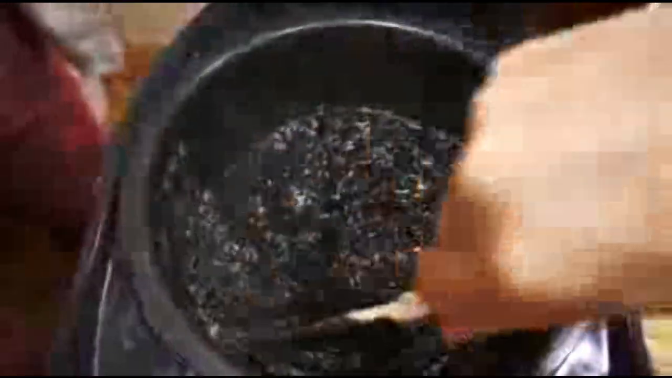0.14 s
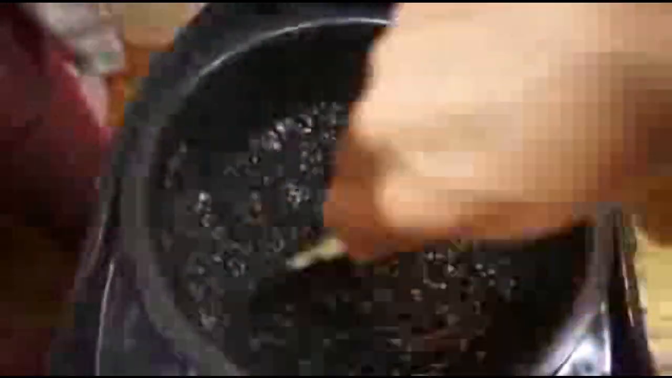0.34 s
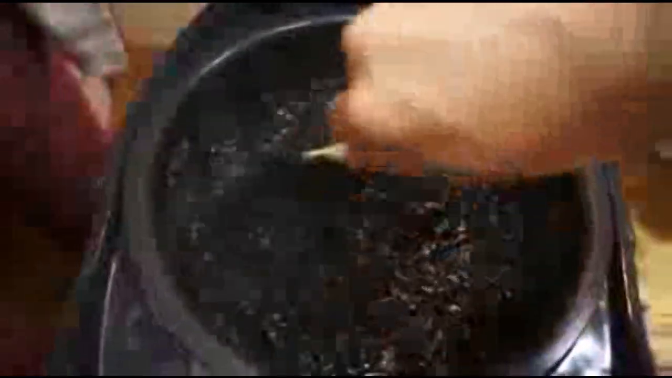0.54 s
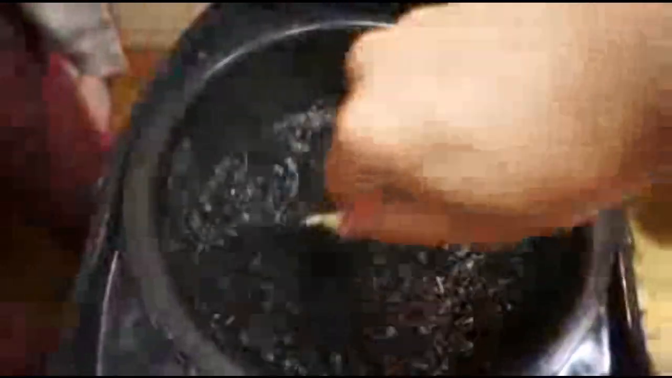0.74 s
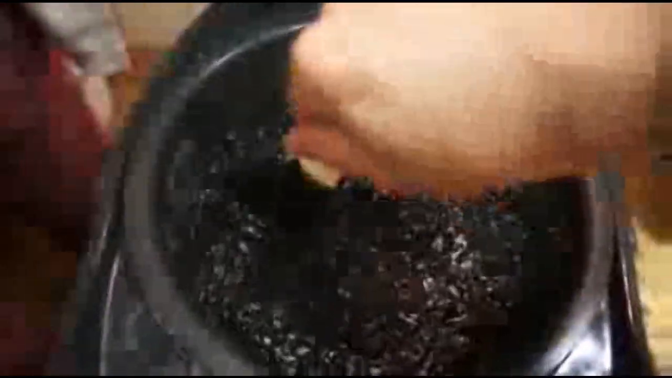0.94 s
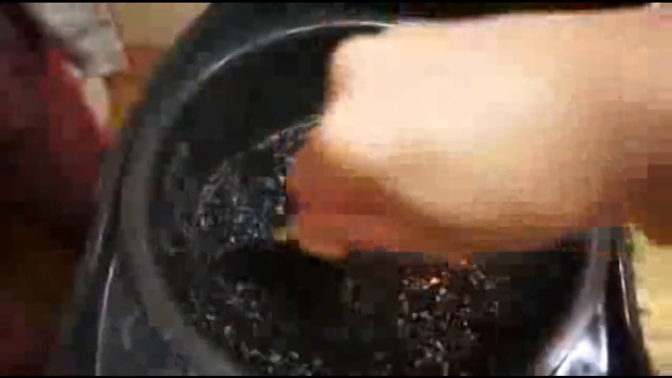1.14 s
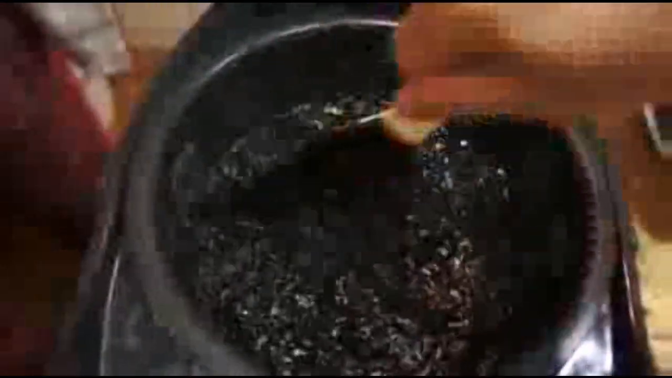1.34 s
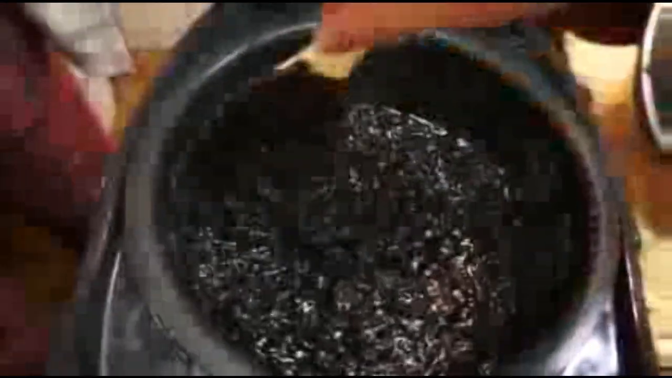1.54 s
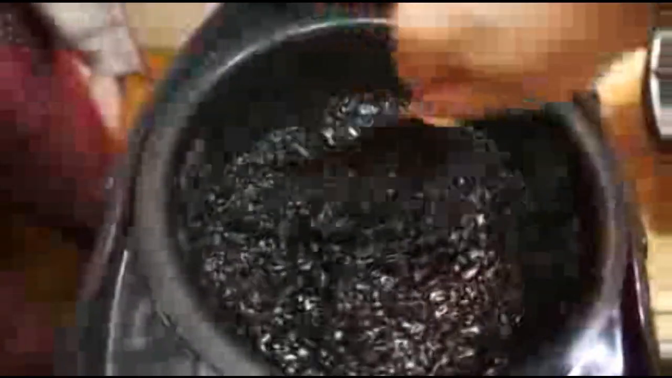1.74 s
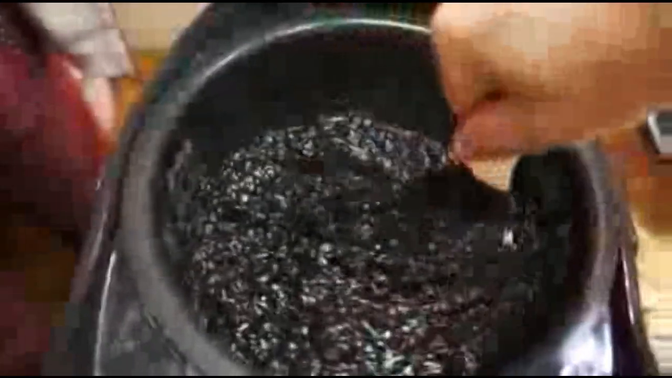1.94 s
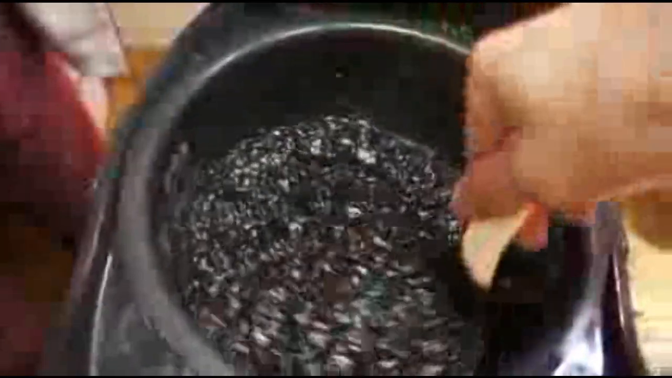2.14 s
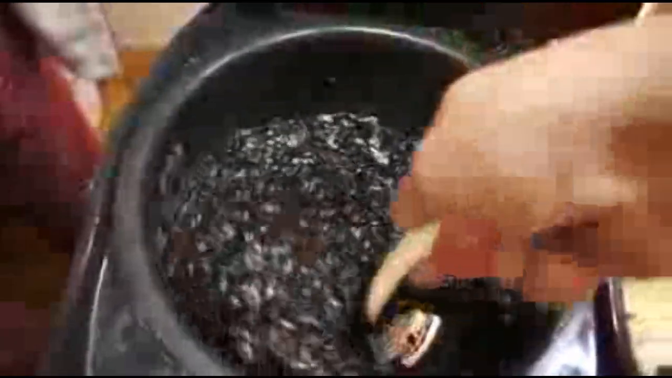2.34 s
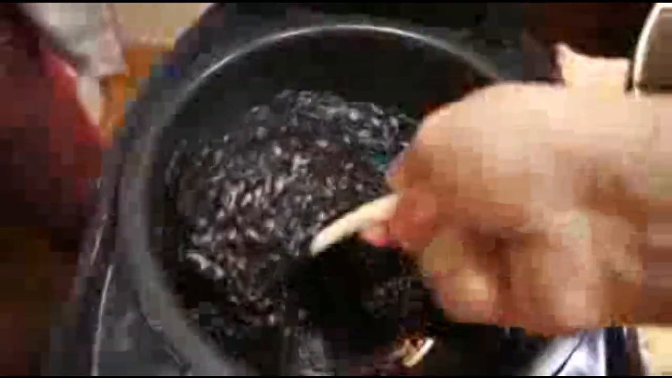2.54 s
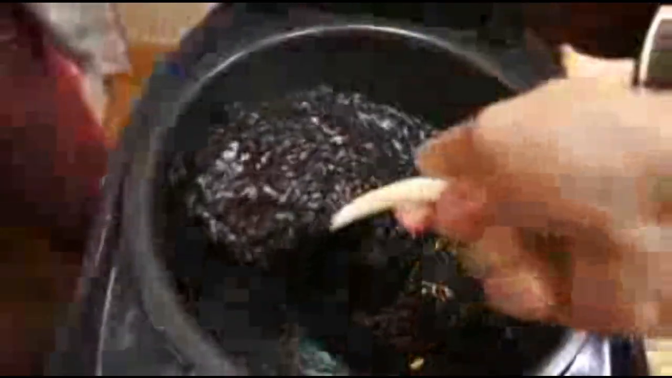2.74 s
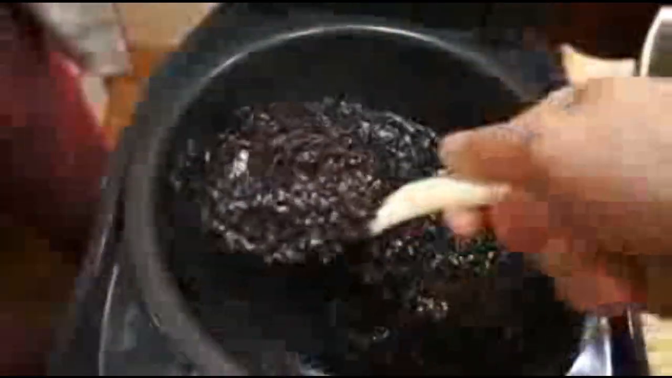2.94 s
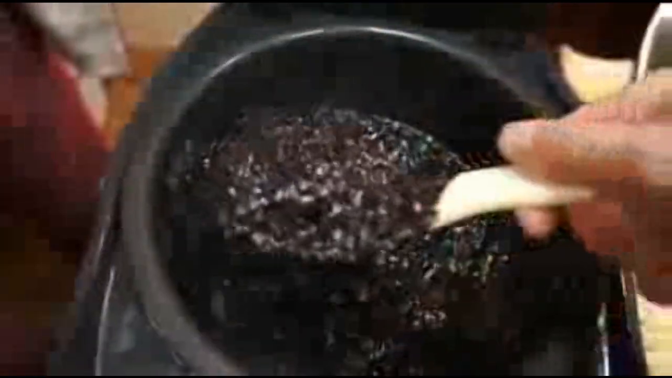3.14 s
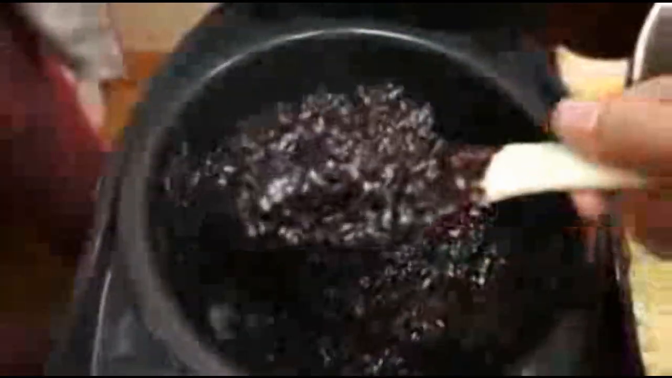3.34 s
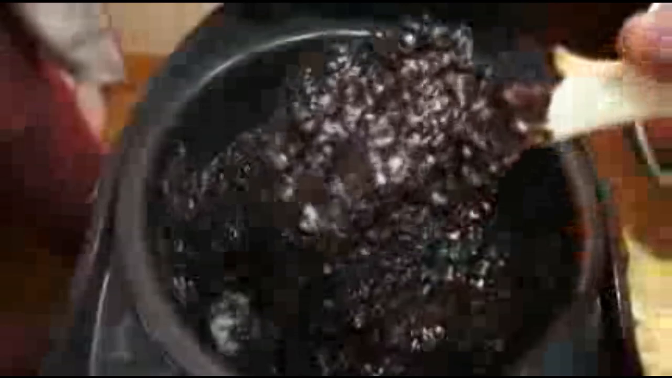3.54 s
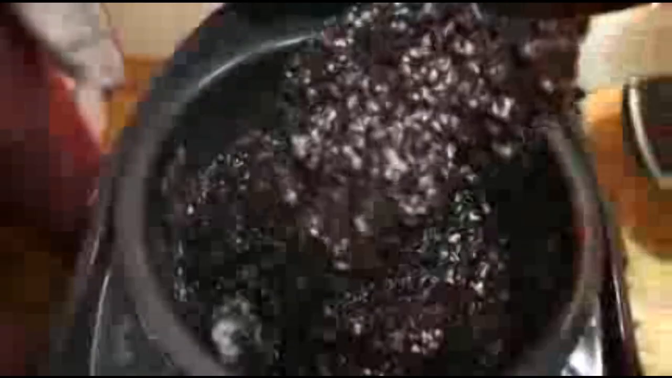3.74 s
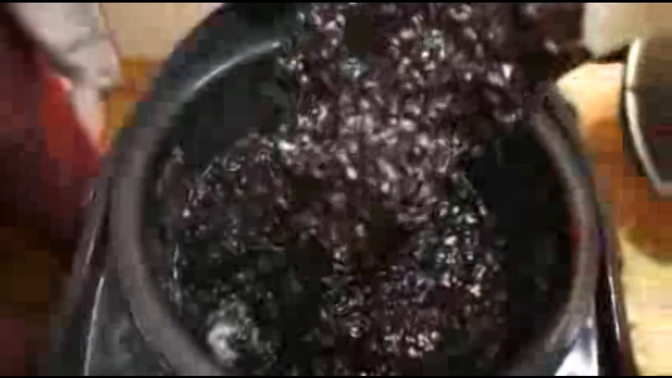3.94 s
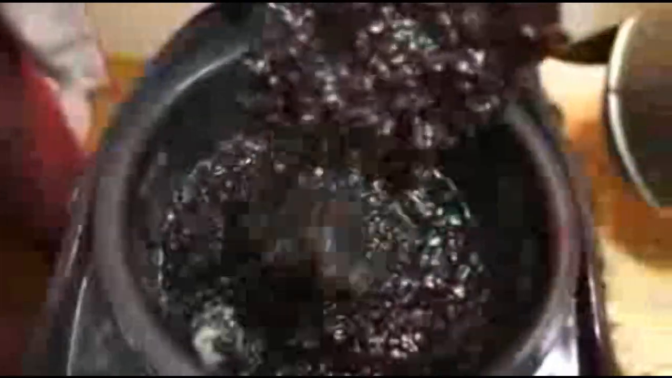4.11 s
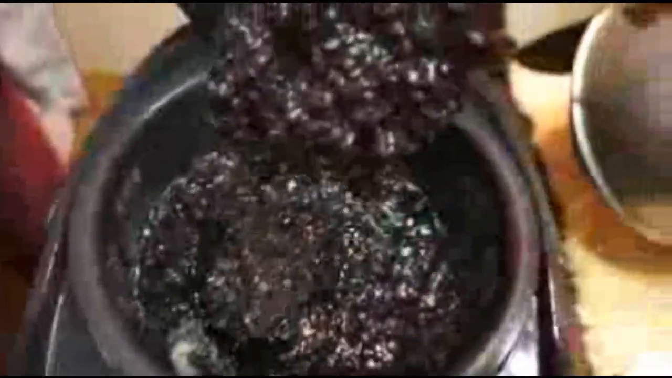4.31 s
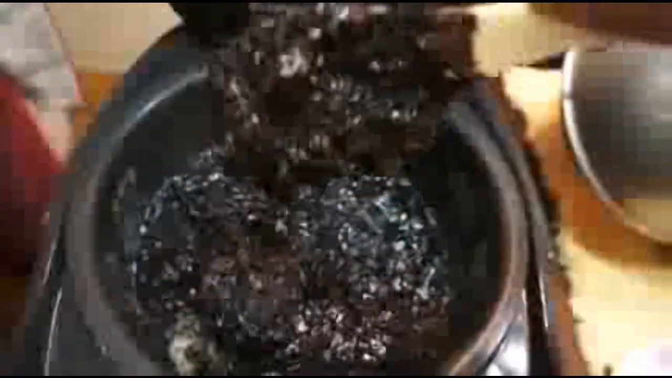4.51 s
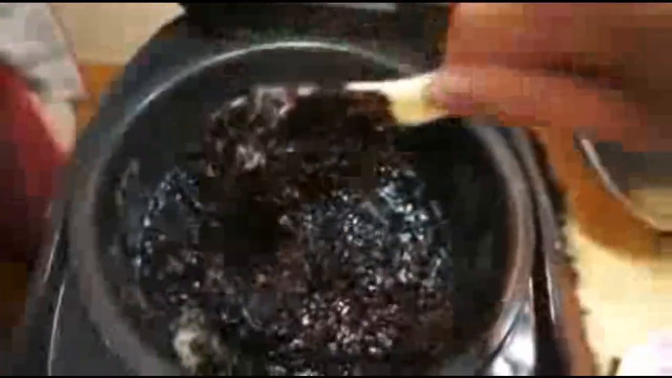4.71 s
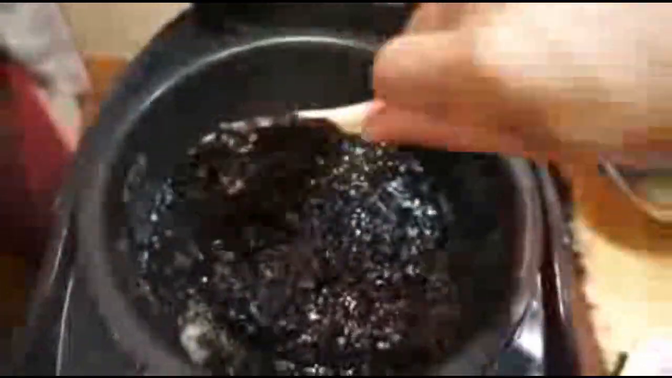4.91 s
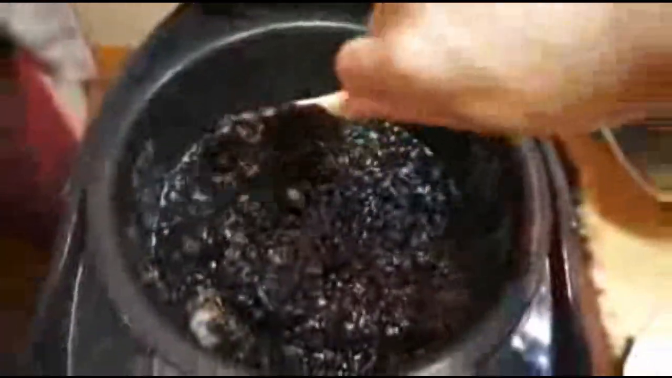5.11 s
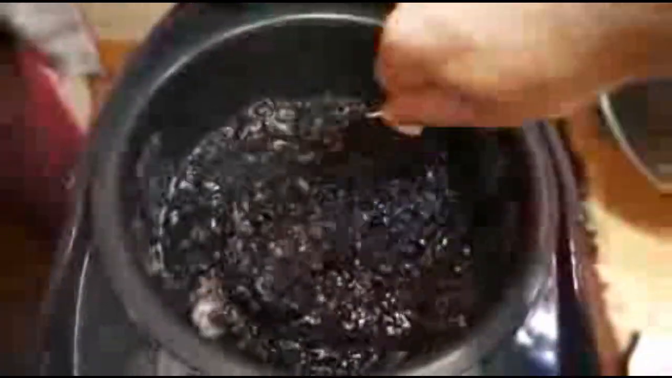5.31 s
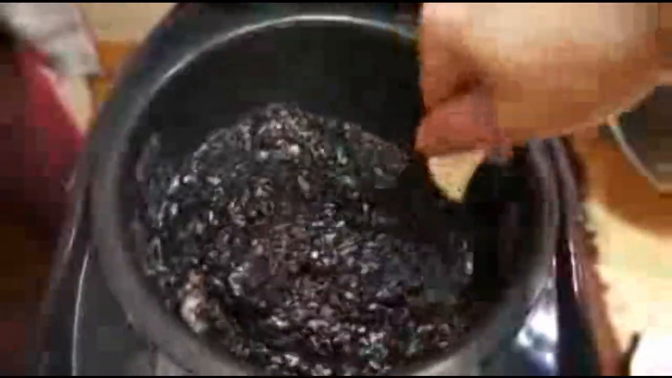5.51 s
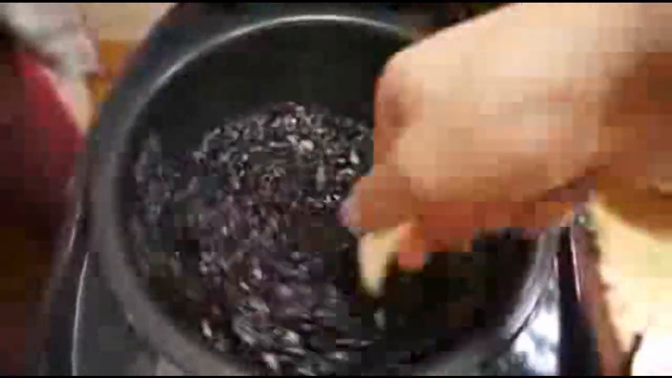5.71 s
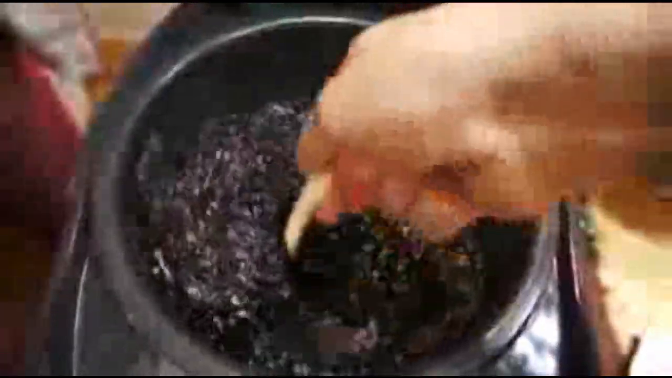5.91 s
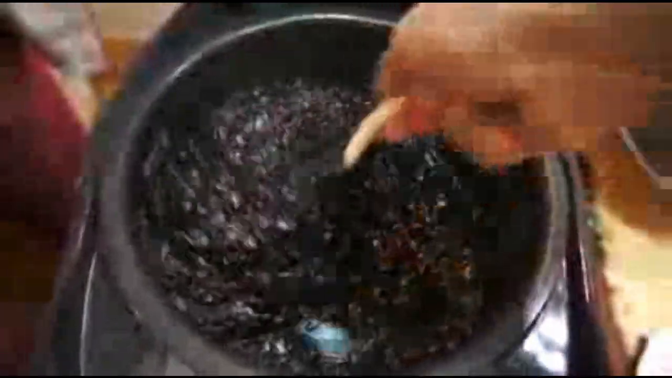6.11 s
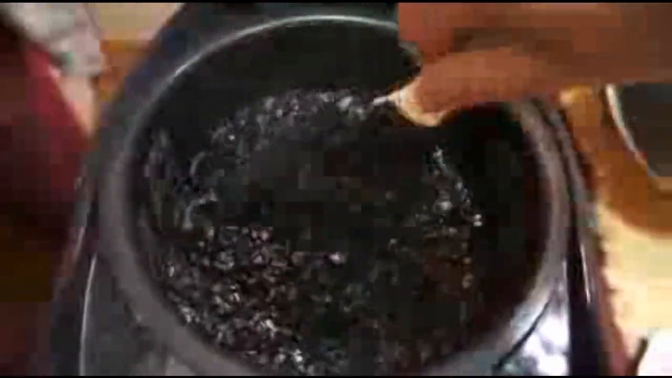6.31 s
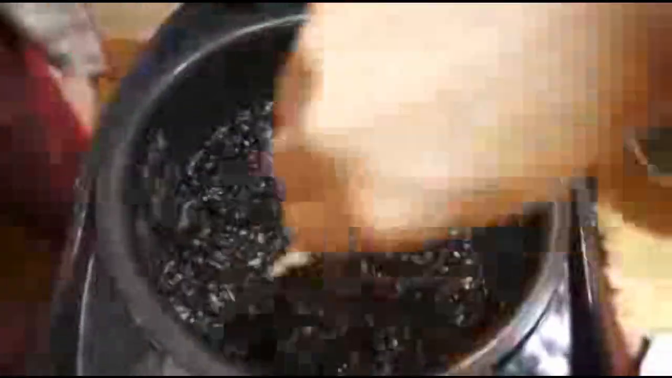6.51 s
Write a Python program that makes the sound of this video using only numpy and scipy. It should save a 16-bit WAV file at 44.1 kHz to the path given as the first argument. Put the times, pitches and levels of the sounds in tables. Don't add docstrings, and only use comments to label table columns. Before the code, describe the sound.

Handheld phone stereo, close and slightly lossy, with soft hiss and a limited top end. A paddle rings the pot's rim, thumps its rice-damped wall and rubs through sticky grains with moist crackling. Busy for nearly three seconds, quiet for over two while a few faint taps tick, then a strong thud with a pot jolt, renewed scraping and a final hard rim knock. Short indoor reverberation.

```python
import sys
import numpy as np
from scipy import signal
from scipy.fft import rfft, irfft, next_fast_len
from scipy.io import wavfile
from scipy.ndimage import uniform_filter1d

SR = 44100
rng = np.random.default_rng(int(sys.argv[2]) if len(sys.argv) > 2 else 0)


def int16_out(signal):
    q = np.round(np.clip(np.atleast_2d(signal).T, -1, 1) * 32767)
    wavfile.write(sys.argv[1], SR, q.astype(np.int16))


def gain_from_db(level_db):
    decades = np.asarray(level_db, float) / 20
    return 10 ** decades


N = 293706

# [f/Hz, density/dB per Hz]
HISS = [(12, -45), (20, -14), (149, -7.5), (555, -6.5), (711, -6), (766, -8), (1080, -12), (1200, -12),
        (6460, -20.5), (7500, -18.5), (9750, -50), (16500, -120)]
# [f/Hz, likeness]
HISS_ALIKE = [(100, 0.985), (1000, 0.41), (4000, 0.09), (8000, 0.12)]
# [t/s, force level/dB, wetness level/dB]
STIR = [(0, -74, 3.5), (.3, -69.5, 10.5), (.68, -62, -3), (.98, -63, -5), (1.17, -66.5, -5),
        (1.43, -66, 5.5), (1.56, -69.5, 1.5), (1.78, -77, 7), (1.909, -60, -9.5), (2.22, -57.5, -12),
        (2.47, -57, -11.5), (2.74, -67, 8.5), (3.001, -76.5, 8), (5.1, -78, -23.5), (5.45, -72.5, 2),
        (5.73, -57, -4), (6.1, -65.5, 2), (6.66, -65, -1.5)]
# [f/Hz, width/Hz, level/dB]
PUSH_MODES = [(294.6, 57, -0.5), (507, 74, 2.5), (738, 213, -2.5)]
# [f/Hz, width/Hz, level/dB]
SCRAPE_MODES = [(1310, 480, 0.5), (2100, 130, -2), (2580, 800, -3.5)]
# [f/Hz, width/Hz, level/dB]
SQUISH_MODES = [(4520, 5600, -4.5), (5820, 3550, 4.5), (7350, 2150, 6)]
# [t/s, level at 1 kHz/dB, tilt/dB per octave, narrowness/dB per octave squared]
RIM_HITS = [
    (0.113, -20.5, 6.5, 3.5),
    (0.987, -24.5, -0.0, 5.5),
    (1.733, -33, 8, 1.2),
    (6.616, -32, 14.5, 7),
    (6.626, -18, 4.5, 5.0),
]
# [t/s, level at 1 kHz/dB, tilt/dB per octave, narrowness/dB per octave squared]
WALL_HITS = [(.457, -37, -8.5, 7), (.61, -37.5, 3.5, 1), (.904, -42, -3, -.5), (1.217, -50.5, -6, 1.5),
             (1.28, -35.5, -6.5, 6.5), (1.913, -31.5, -5.5, 0), (2.177, -25.5, 7.5, 11.5),
             (2.298, -46, -10.5, 12), (2.638, -41.5, 1.5, 2.3), (5.406, -26.5, -7.5, 3.5),
             (5.441, -59.5, -4, 7), (5.648, -49, 7, 0.9), (5.776, -38.5, 5, 7), (6.284, -39.5, 0.5, 3.5)]
# [t/s, level at 1 kHz/dB, tilt/dB per octave]
TAPS = [(0.282, -57.5, -7), (0.362, -52, -1.5), (0.428, -53.0, -3.5), (0.659, -48.5, -1),
        (2.518, -51.0, -5), (2.559, -49, -3), (2.58, -51.5, 4.5), (2.716, -63.5, -4.5), (4.313, -54, 7),
        (4.655, -54.5, 6.3), (4.682, -55.5, 0.5), (5.024, -73, 6), (5.461, -51.5, 4.2), (5.809, -46, -0.5),
        (6.055, -51, -1.45), (6.128, -50, -0.7), (6.226, -58.5, 8)]
# [f/Hz, level/dB, t60/s]
RIM_MODES = [(308, -1, 0.36), (500.5, 2, 0.19), (772, -5.5, 0.06), (995, -0.5, 0.035), (1304, 6.5, 0.033),
             (1580, -18.5, 0.03), (1920, -23, 0.013), (2100, -5.5, 0.044), (2530, -18, 0.02),
             (2760, -5, 0.062), (3300, -10, 0.03), (4210, 0.5, 0.0054)]
# [f/Hz, level/dB, t60/s]
WALL_MODES = [(188.7, -3.5, 0.076), (294, 12, 0.055), (416, 0.5, 0.062), (516.8, 9, 0.078), (607, 5, 0.061),
              (815, -1, 0.058), (984, 2, 0.041), (1292, 0.5, 0.035), (1486, -6, 0.084),
              (1894, -39.5, 0.074), (2300, -19, 0.016), (3225, 2, 0.06), (3400, -3, 0.031),
              (4460, -2.5, 0.03), (5050, -9, 0.069), (6100, -8, 0.11), (6780, 1.5, 0.032)]
# [f/Hz, t60/s]
KITCHEN_DECAY = [(200, 0.5), (1500, 0.224), (8000, 0.247)]
# [f/Hz, likeness]
ROOM_ALIKE = [(200, 0.946), (1000, 0.82), (4000, 0.28), (8000, 0.35)]
# [t/s, peak level/dB, f/Hz]
POPS = [(0.115, -28, 2100), (0.3792, -42, 3100), (0.5926, -34.5, 3420), (0.6122, -28, 3060),
        (0.9058, -35.5, 2220), (0.9896, -36, 1890), (1.283, -38.5, 2820), (1.5196, -38.5, 2213),
        (1.7358, -28, 2850), (1.8444, -37.5, 3600), (1.8994, -33, 3450), (1.9129, -30, 3090),
        (1.942, -43, 3150), (2.1111, -62, 3200), (2.3084, -37, 3220), (2.4329, -45, 2470),
        (2.5631, -35.5, 1940), (2.582, -37, 2796), (2.6171, -33.5, 3980), (2.7217, -39, 2570),
        (2.7494, -35, 3340), (2.8654, -46, 3300), (2.9067, -38.5, 3230), (3.3183, -42.5, 2860),
        (4.1759, -42, 2960), (5.0277, -42.5, 2880), (5.3284, -34.5, 4240), (5.6495, -28, 2760),
        (5.8077, -48, 2820), (6.2294, -36.5, 2820)]
# [t/s, peak level/dB, f/Hz, left-right level/dB]
TICKS = [(0.2041, -31, 6330, 2), (0.2304, -33.5, 5290, 3), (0.3189, -41, 6340, 4.5),
         (1.038, -42, 7500, -5.5), (1.0964, -37, 7050, -4.5), (1.2311, -38.5, 6420, -1.5),
         (1.275, -36, 6510, 0), (1.3357, -44, 6600, -5), (1.3763, -41, 7900, -2.5),
         (2.158, -43.5, 5170, -3), (2.1799, -20.5, 7350, -5), (2.6655, -35.5, 7780, -7.5),
         (3.0602, -41, 7790, -4.0), (3.3538, -41.5, 6680, -2), (3.3817, -40, 7890, -3.0),
         (4.3072, -38, 7790, 5), (4.349, -44, 6900, -2), (4.3628, -39.5, 6820, 3), (5.2312, -45, 7930, 3),
         (5.3896, -39, 7930, -3.5), (5.555, -39.5, 6680, -2), (5.7578, -35, 7840, -6),
         (5.8625, -33.5, 6080, 1), (5.885, -42, 6150, 1), (5.913, -38.5, 6100, -1.0), (5.992, -52, 5970, 2),
         (6.0337, -43, 6760, -1.0), (6.3535, -46, 7000, -14), (6.3984, -42, 7840, -5.5),
         (6.4596, -44, 5590, -5)]
# [t/s, length/s, f/Hz, level/dB]
SWIPES = [(0.127, 0.16, 4200, -57.5), (.17, 0.098, 6500, -52), (0.594, 0.081, 6325, -50),
          (0.863, 0.083, 517, -48.5), (1.202, 0.03, 319, -53), (1.359, 0.13, 7200, -60),
          (1.829, .11, 3330, -52.5), (2.19, 0.066, 7080, -53), (2.299, 0.228, 2620, -64.5),
          (2.476, 0.081, 2300, -60), (2.731, 0.21, 3350, -60.5), (4.302, 0.0915, 7500, -57.5),
          (5.763, 0.073, 1870, -56.5), (5.854, 0.087, 6300, -57.5), (6.168, 0.08, 3450, -60.5),
          (6.292, 0.0445, 2770, -51.5), (6.295, 0.059, 7700, -55), (6.613, 0.0276, 6800, -40)]
# [t/s, peak level/dB, f/Hz, length/s]
JOLTS = [
    (.46, -54.5, 85, 0.0655),
    (1.929, -60, 60, 0.12),
    (2.65, -66, 60, 0.086),
    (5.405, -36, 138, 0.014),
    (5.43, -60, 60.4, 0.1),
]
# [t of blow/s, lower edge f/Hz, depth level/dB]
GAPS = [(.113, 100, 30), (.454, 2500, 10), (.993, 900, 22), (1.225, 3500, 12), (1.28, 1300, 18),
        (1.737, 100, 25), (2.16, 1500, 9), (5.408, 100, 20), (5.644, 1300, 20), (6.288, 1300, 15),
        (6.616, 100, 35)]
# [f/Hz, level/dB]
MIRROR_LEAK = [(5800, -78), (6800, -49.5), (7300, -10), (7900, -11.5)]
# [f/Hz, level/dB]
SHIFT_LEAK = [(5000, -44), (6500, -32.5), (7300, -27), (7900, -25)]


def unit(x):
    return x / np.sqrt(np.mean(x ** 2) + 1e-20)


def along(points, hz):
    f, v = np.transpose(points)
    return np.interp(np.log(hz + 1), np.log(f + 1), v)


def filtered(x, response):
    m = next_fast_len(N + SR // 4)
    return irfft(rfft(x, m) * response(np.fft.rfftfreq(m, 1 / SR)), m)[..., :N]


def smoothed(x, rows, columns):
    return uniform_filter1d(uniform_filter1d(x, size=rows, axis=0), size=columns, axis=1)


def resonances(modes):
    def response(f):
        return sum((-1) ** k * gain_from_db(db) * 1j * f * w / (c * c - f * f + 1j * f * w)
                   for k, (c, w, db) in enumerate(modes))
    return response


def panned(x, db):
    return x * gain_from_db([[db / 2], [-db / 2]])


def spread(pair, alike, response):
    def mid_side(hz):
        turn = np.arccos(np.clip(along(alike, hz), -1, 1)) / 2
        return response(hz) * np.array([np.cos(turn), np.sin(turn)])
    mid, side = filtered(pair, mid_side)
    return np.array([mid + side, mid - side])


def hiss():
    tone = spread(rng.standard_normal((2, N)), HISS_ALIKE, lambda hz: gain_from_db(along(HISS, hz)))
    whistle = filtered(rng.standard_normal((2, N)), lambda hz: np.exp(-((hz - 7830) / 90) ** 2))
    return gain_from_db(-66.5) * unit(tone) + panned(gain_from_db(-75.0) * unit(whistle), -4.5)


def rubbing(modes, per_s, size_db, patchy_db, bed, alike):
    slips = (rng.random(N) < per_s / SR) * gain_from_db(size_db * rng.standard_normal(N))
    grains = np.convolve(slips, gain_from_db(-60 * np.arange(260) / SR / 0.0049))[:N]
    z = signal.stft((unit(grains) + bed) * rng.standard_normal((2, N)), nperseg=256)[2]
    patches = unit(smoothed(rng.standard_normal(z.shape[1:]), 5, 9))
    pair = signal.istft(z * gain_from_db(patchy_db * patches), nperseg=256)[1][:, :N]
    return unit(spread(pair, [(1000, alike)], resonances(modes)))


def stirring():
    s, *levels = np.transpose(STIR)
    push_db, wet_db = [np.interp(np.arange(N) / SR, s, c) for c in levels]
    drag_db, drag_t60 = -29, 0.31
    at, blow_db = np.transpose(RIM_HITS + WALL_HITS)[:2]
    blows = np.bincount((at * SR).astype(int), gain_from_db(blow_db + drag_db), N)
    drag = signal.lfilter([1], [1, -gain_from_db(-60 / drag_t60 / SR)], blows)
    push = rubbing(PUSH_MODES, per_s=160, size_db=3.5, patchy_db=3.5, bed=1.8, alike=.96)
    push = gain_from_db(push_db + 2.5) * push
    scrape = rubbing(SCRAPE_MODES, per_s=270, size_db=2.5, patchy_db=3.0, bed=1.0, alike=0.883)
    scrape = (gain_from_db(push_db + 0.49 * wet_db - 1.0) + drag) * scrape
    squish = rubbing(SQUISH_MODES, per_s=210, size_db=6.0, patchy_db=5.5, bed=1.0, alike=0.51)
    squish = gain_from_db(push_db + wet_db + 1.5) * squish
    return panned(push + scrape, 0.043) + panned(squish, -2.5)


def colour(hz, tilt, narrow):
    octaves = np.log2(hz / 1000 + .02)
    return tilt * octaves - narrow * octaves ** 2


def knocks(hits, modes, scatter_db, gain_db, body_db, blur):
    lead_s, early_s = 0.0024, .007
    burst_db, burst_t60, body_t60 = -5, .028, .07
    out, t = np.zeros(N + SR), np.arange(SR // 4) / SR
    hz, level, t60 = np.transpose(modes)[:, :, None]
    fade = 0.65 * gain_from_db(-60 * t / (0.29 * t60)) + 0.29 * gain_from_db(-60 * t / t60)
    fade *= 1 - np.exp(-t * hz / 0.62)
    body_fade = gain_from_db(body_db - 60 * t / body_t60) * (1 - np.exp(-t / 0.0026))
    burst_fade = gain_from_db(burst_db - 60 * np.abs(t - early_s - lead_s) / burst_t60) * np.minimum(t / early_s, 1)
    grid = np.fft.rfftfreq(len(t), 1 / SR)
    for s, db, *shape in hits:
        size = gain_from_db(colour(hz, *shape) + level + scatter_db * rng.standard_normal(hz.shape))
        drift = blur * np.cumsum(rng.standard_normal((len(hz), len(t))), 1) * np.sqrt(hz / SR)
        detuned = hz * (1 + 0.022 * blur * rng.standard_normal(hz.shape))
        turn = 2 * np.pi * detuned * t + drift
        ring = (size * fade * np.sin(turn)).sum(0)
        tint = gain_from_db(colour(np.clip(grid, 200, 7000), *shape)) / (grid / 1000 + .3)
        noise = irfft(rfft(rng.standard_normal((2, len(t)))) * tint, len(t))
        body = body_fade * noise[0]
        burst = burst_fade * noise[1]
        out[round((s + lead_s) * SR):][:len(t)] += gain_from_db(db + gain_db) * (ring + body)
        out[round((s - early_s) * SR):][:len(t)] += gain_from_db(db + gain_db) * burst
    return out[:N]


def kitchen(x):
    hz, t, z = signal.stft(rng.standard_normal((2, SR // 3)), SR, nperseg=256)
    fade = gain_from_db(-60 * t / along(KITCHEN_DECAY, hz)[:, None])
    tail = signal.istft(z * fade, SR, nperseg=256)[1]
    late = np.pad(x, (300, 0))[None]
    wet = signal.fftconvolve(late, tail / np.linalg.norm(tail[0]), axes=1)[:, :N]
    return spread(wet, ROOM_ALIKE, np.ones_like)


def smacks():
    out, t = np.zeros((2, N + SR)), np.arange(SR // 40) / SR
    pops = [(s, db + 9, hz, -1 + 1.5 * rng.standard_normal()) for s, db, hz in POPS]
    ticks = [(s, db + 15.5, hz, pan_db) for s, db, hz, pan_db in TICKS]
    for s, db, hz, pan_db in pops + ticks:
        lag = .00005 * rng.standard_normal((2, 1))
        turn = 2 * np.pi * hz * (t + lag)
        swing = np.sin(turn) + .6 * np.sin(1.55 * turn) + .5 * np.sin(.62 * turn)
        pop = swing * np.exp(-t * hz / 2.2)
        spray = 0.13 * np.diff(rng.standard_normal((2, len(t) + 1))) * gain_from_db(-60 * t / 0.036)
        onset = 1 - np.exp(-t / 0.00094)
        out[:, round(s * SR):][:, :len(t)] += gain_from_db(db) * onset * panned(pop + spray, pan_db)
    return out[:, :N]


def swipes():
    out = np.zeros((2, N + SR))
    for s, length, hz, db in SWIPES:
        t = np.arange(round(length * SR)) / SR
        grains = np.repeat(rng.exponential(size=80) ** 2, SR // 350)
        grit = 1 + 0.23 * grains[:len(t)]
        shared, own = rng.standard_normal(SR // 4), rng.standard_normal((2, SR // 4))
        rough = (shared + hz / 6000 * own)[:, :len(t)] * grit
        b, a = signal.iirpeak(hz, 1 / .28, SR)
        stroke = signal.lfilter(b, a, signal.lfilter(b, a, rough))
        swell = np.sin(np.pi * t / length) ** .5
        out[:, round(s * SR):][:, :len(t)] += gain_from_db(db) * unit(stroke) * swell
    return panned(out[:, :N], -5.1)


def jolts():
    out, t = np.zeros(N + SR), np.arange(SR // 3) / SR
    for s, db, hz, length in JOLTS:
        swell = np.e * t / length * 3 * np.exp(-3 * t / length)
        swing = np.sin(2 * np.pi * hz * length * (1 - np.exp(-t / length)))
        out[round(s * SR):][:len(t)] += gain_from_db(db) * swell * swing
    return out[:N]


def scene():
    rim = knocks(RIM_HITS, RIM_MODES, scatter_db=1.5, gain_db=1.0, body_db=-1.5, blur=.35)
    touches = [tap + (1.78,) for tap in TAPS]
    wall = knocks(WALL_HITS + touches, WALL_MODES, scatter_db=3.0, gain_db=3, body_db=4, blur=.85)
    pot = filtered(rim + wall, lambda hz: (1j * hz / (1j * hz + 130)) ** 3)
    lag_s = .00004
    sides = np.array([[-1], [1]])
    direct = panned(filtered(pot, lambda hz: np.exp(1j * np.pi * lag_s * hz * sides)), -0.76)
    room = gain_from_db(-9.5) * kitchen(pot)
    return hiss() + stirring() + direct + room + smacks() + swipes() + panned(jolts(), -0.6)


def dropouts(x):
    hz, t, z = signal.stft(x, SR, nperseg=256, noverlap=192)
    chance = unit(smoothed(rng.standard_normal(z.shape[1:]), 2, 20))
    lead_s, gap_s = .022, .015
    loss_db = np.zeros(z.shape[1:])
    for s, above_hz, db in GAPS:
        gap = np.clip((gap_s / 2 - np.abs(t - s + lead_s - gap_s / 2)) / .002 + .5, 0, 1)
        loss_db += db * np.outer(hz > above_hz, gap)
    level_db = 20 * np.log10(smoothed(np.abs(z[0]), 3, 5) + 1e-9)
    masked_db = np.clip(5 * (level_db[1:6].max(0) - level_db - 26), 0, 60)
    loss_db += (hz > 2500)[:, None] * masked_db
    busy = uniform_filter1d(np.abs(z[0, 2:8]).mean(0), size=60) > gain_from_db(-84)
    stray_db = 14 * np.outer((hz > 2500) & (hz < 7400), busy) * (chance > 1.45)
    loss_db[hz > 7500] = np.maximum(2 * loss_db[hz > 7500] - 40, 0)
    ragged = np.clip(1.1 + .8 * chance, .25, 2)
    kept = z * gain_from_db(-loss_db * ragged - stray_db)
    return signal.istft(kept, SR, nperseg=256, noverlap=192)[1][:, :N]


def band_limit(x):
    return signal.sosfilt(signal.butter(12, 16500, fs=SR, output="sos"), x)


def record(dry):
    x = filtered(dropouts(dry), lambda hz: 1 / (1 + (hz / 8050) ** 90))
    t = np.arange(N) / SR
    mirrored = filtered(x, lambda hz: gain_from_db(along(MIRROR_LEAK, hz))) * np.cos(np.pi * SR * t)
    top = filtered(x, lambda hz: gain_from_db(along(SHIFT_LEAK, hz)))
    top = signal.hilbert(top, next_fast_len(N))[:, :N]
    shifted = (top * np.exp(2j * np.pi * 3900 * t)).real
    return band_limit(x + mirrored + shifted)


dry = scene()
out = record(dry)
int16_out(out)
```